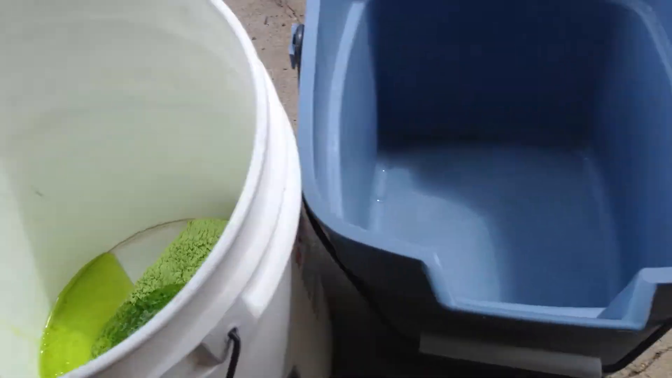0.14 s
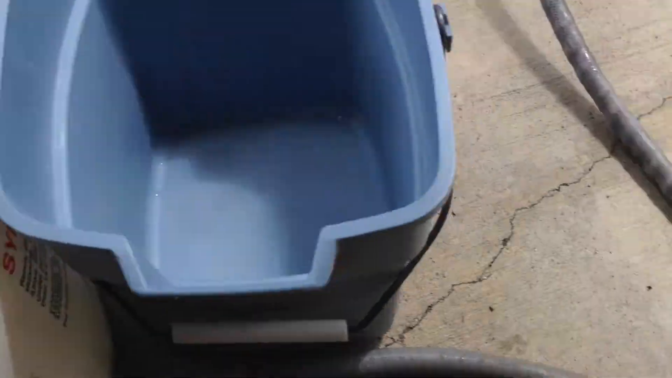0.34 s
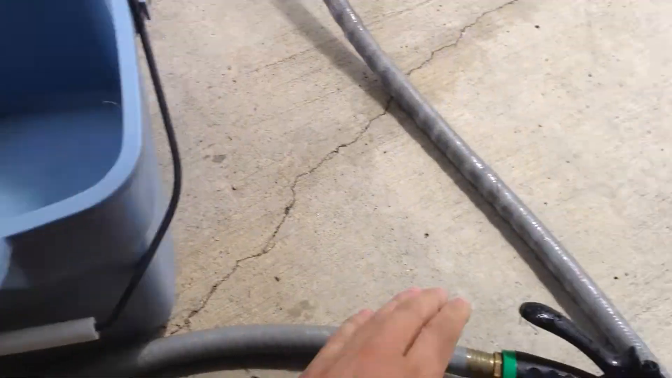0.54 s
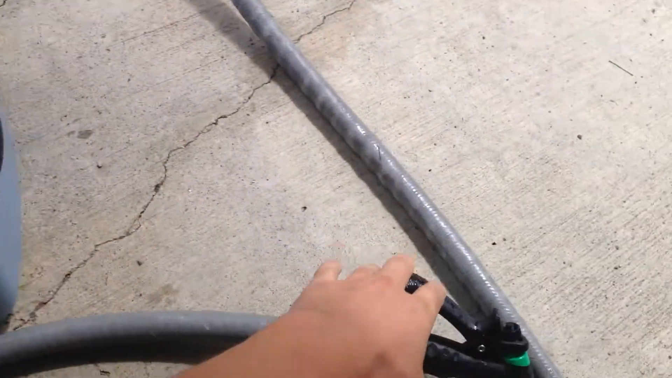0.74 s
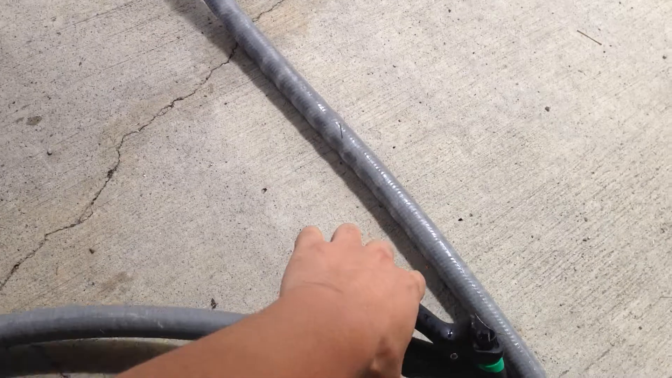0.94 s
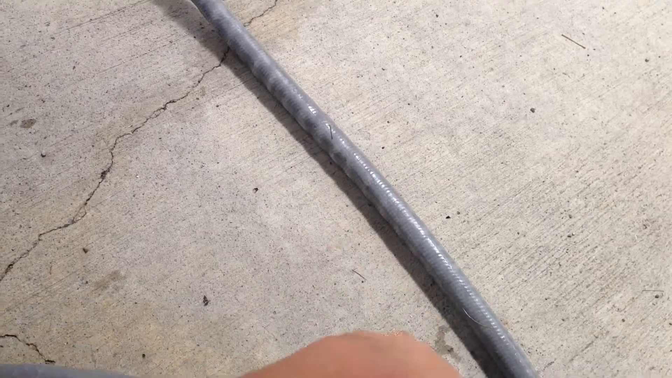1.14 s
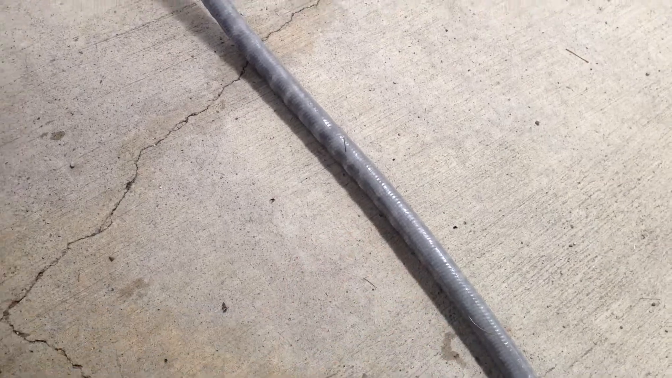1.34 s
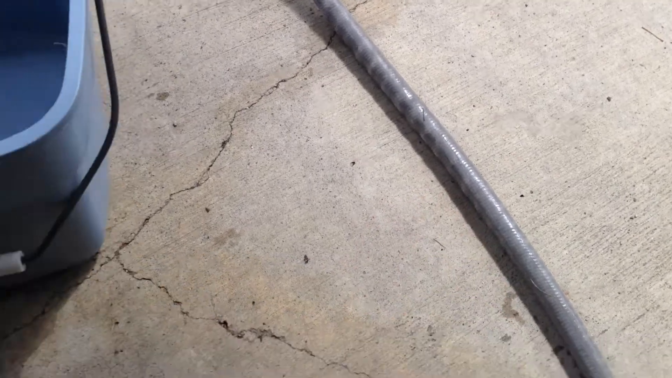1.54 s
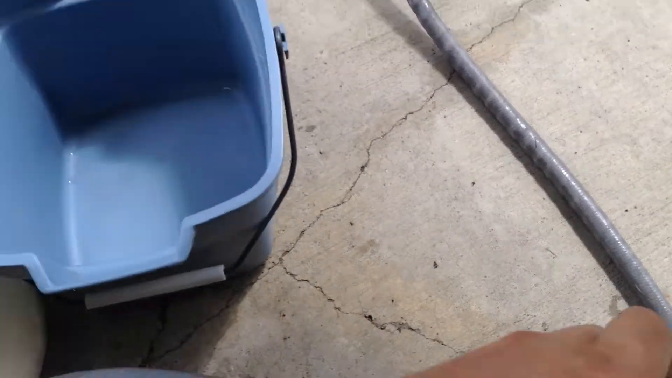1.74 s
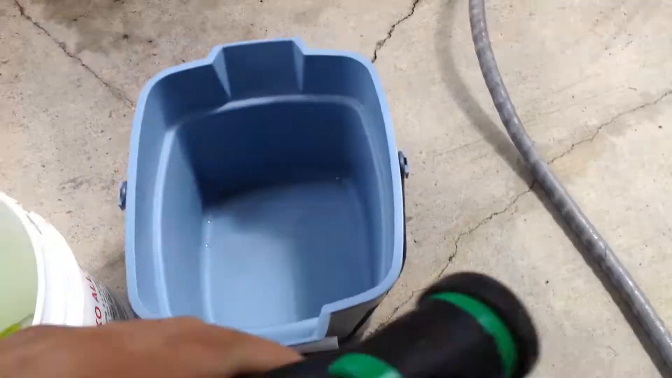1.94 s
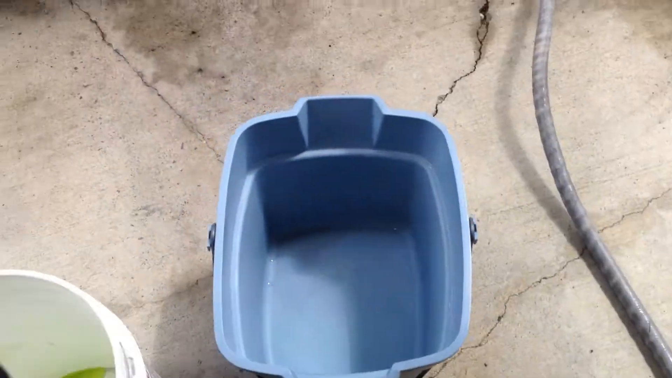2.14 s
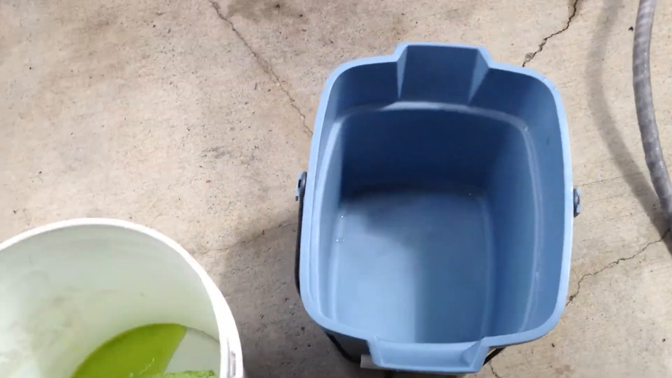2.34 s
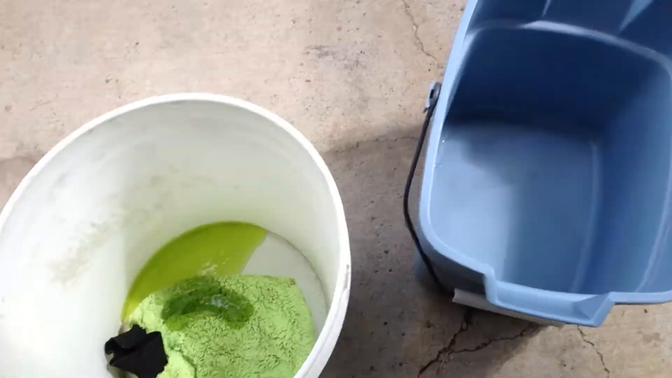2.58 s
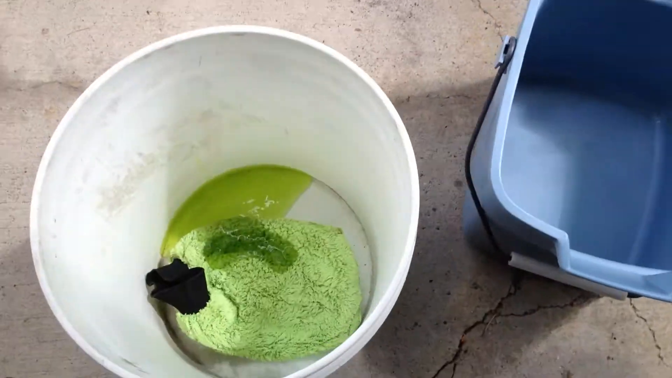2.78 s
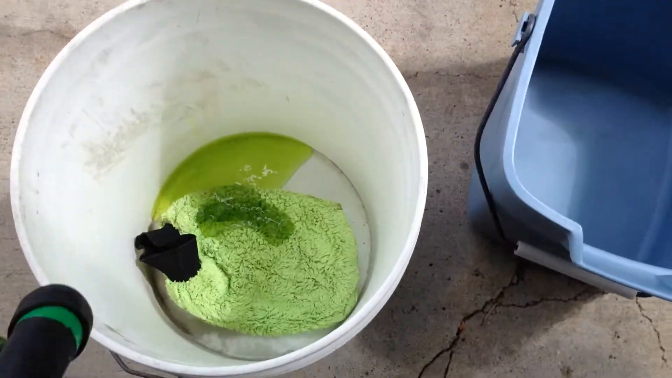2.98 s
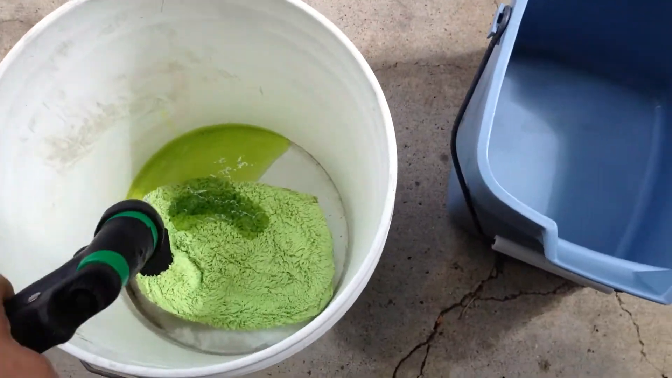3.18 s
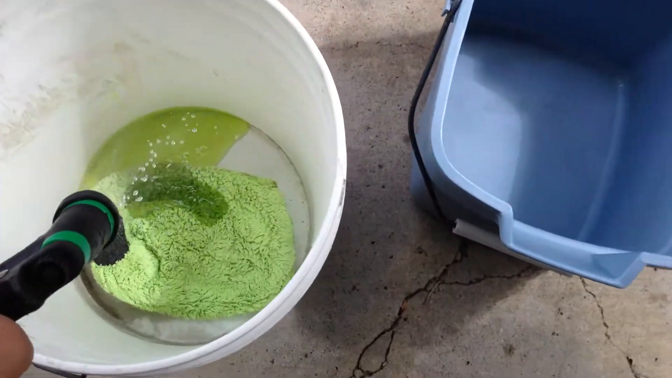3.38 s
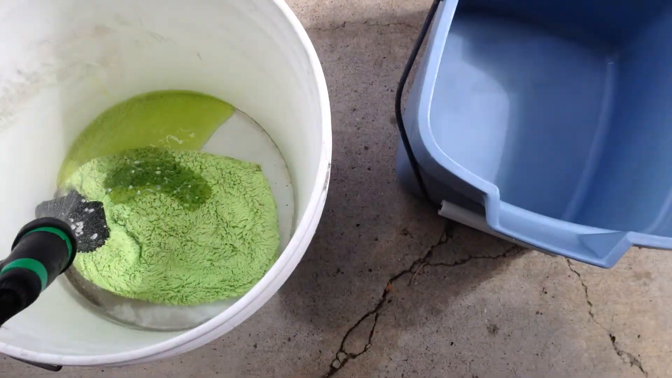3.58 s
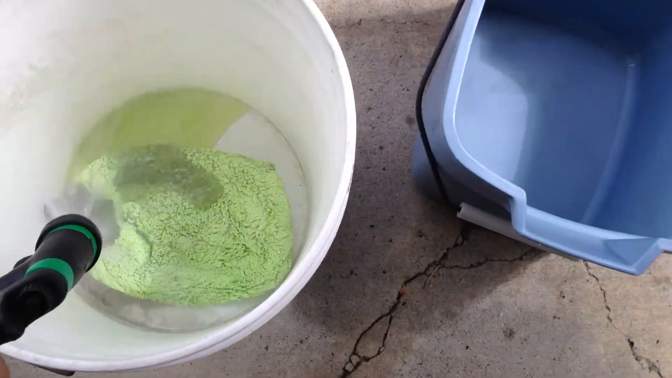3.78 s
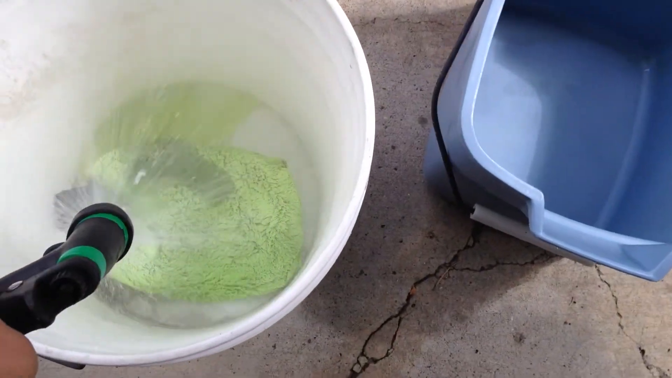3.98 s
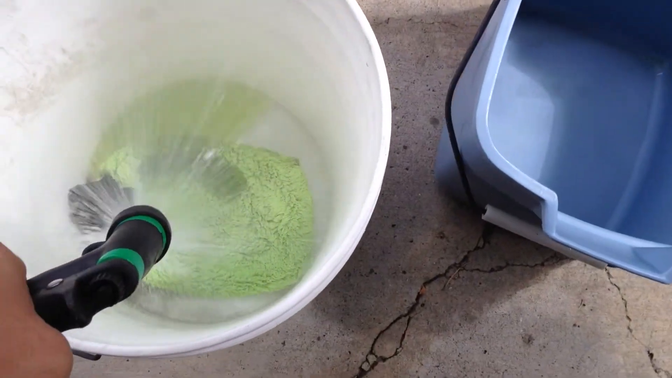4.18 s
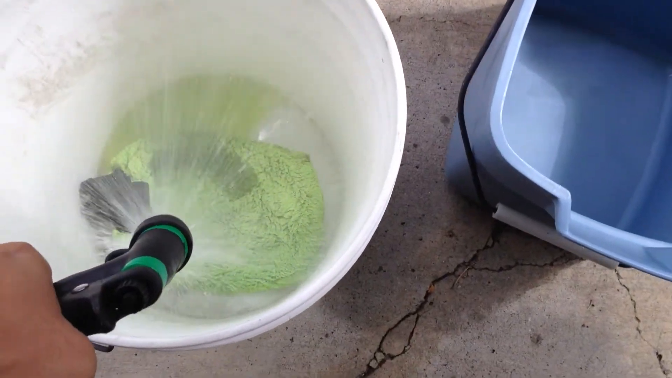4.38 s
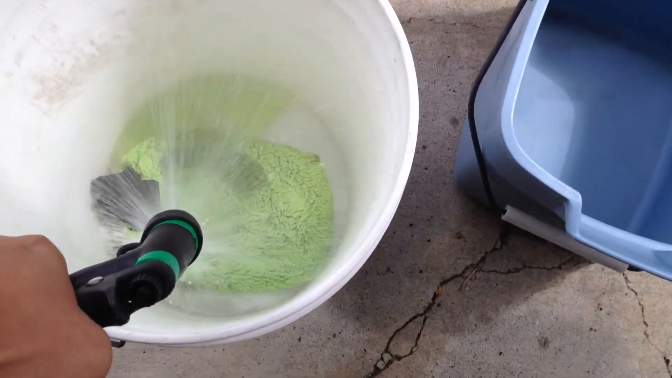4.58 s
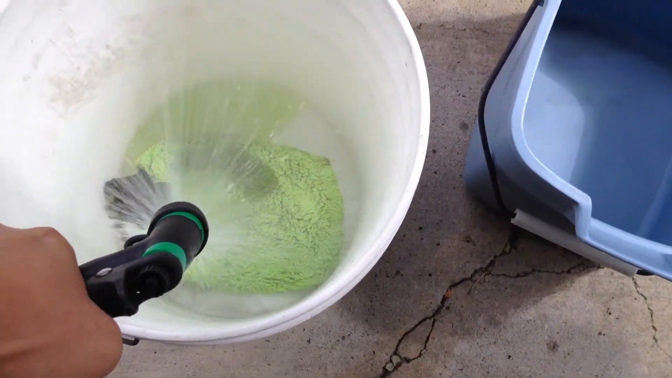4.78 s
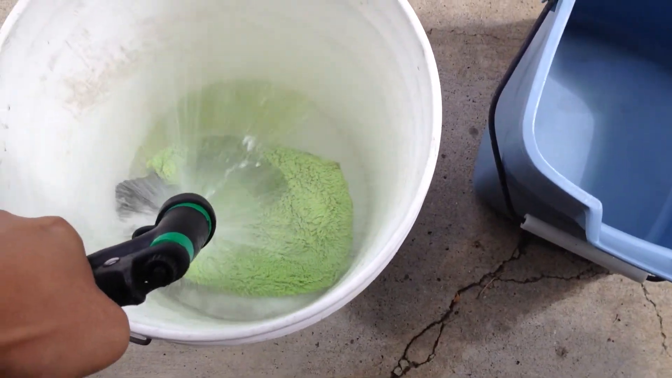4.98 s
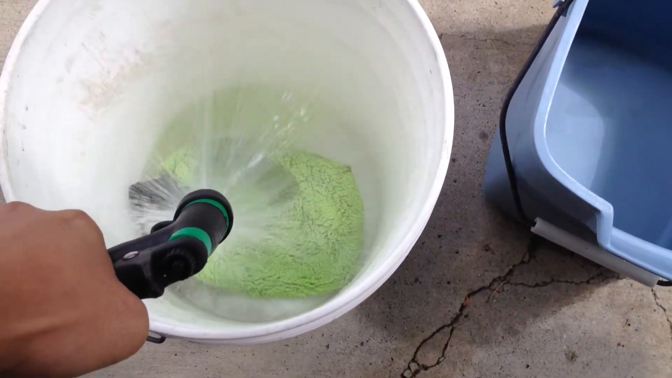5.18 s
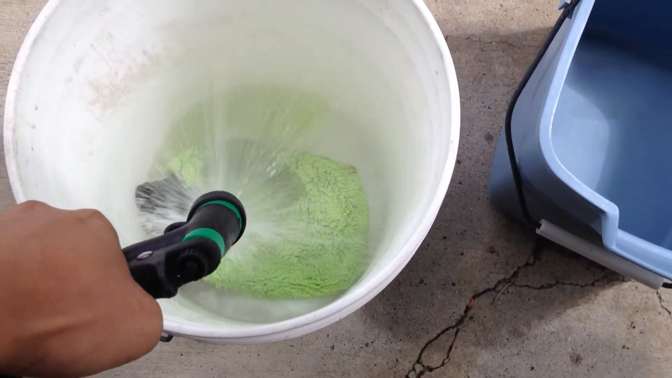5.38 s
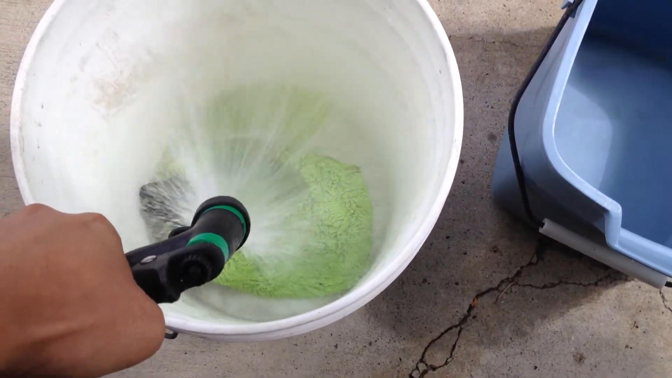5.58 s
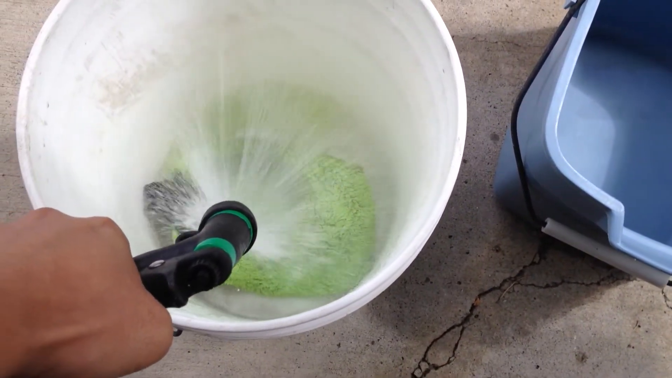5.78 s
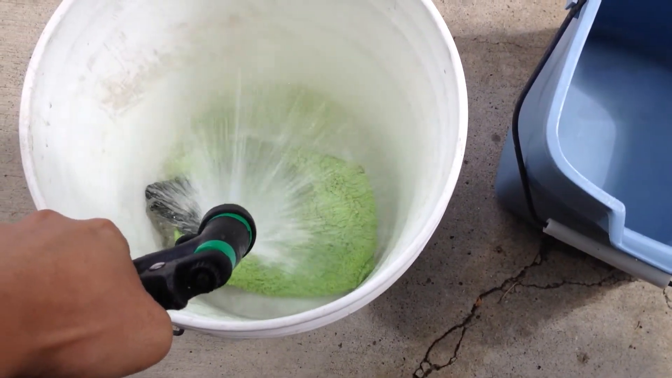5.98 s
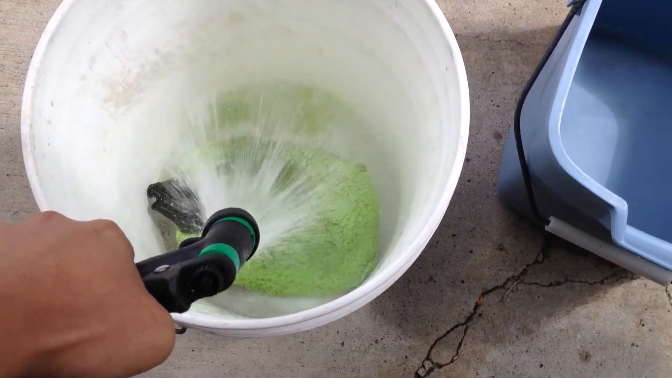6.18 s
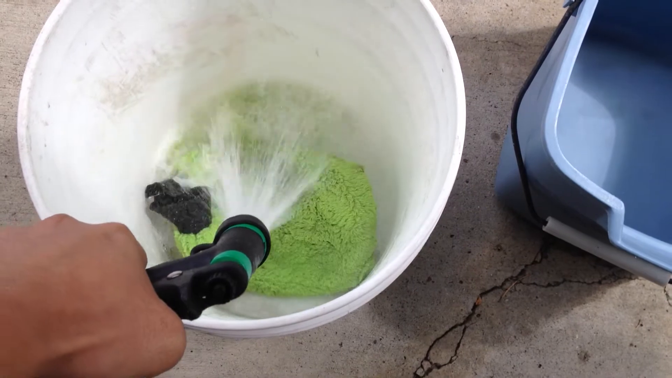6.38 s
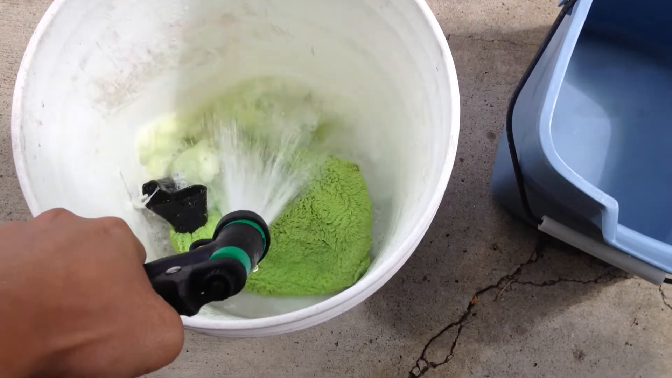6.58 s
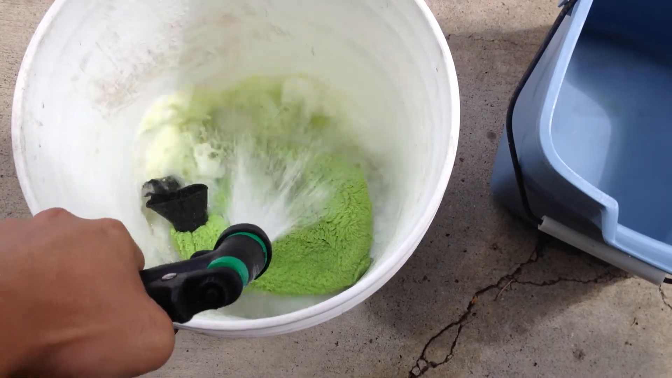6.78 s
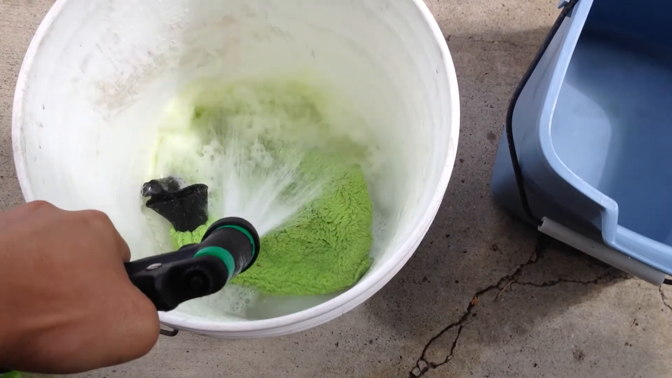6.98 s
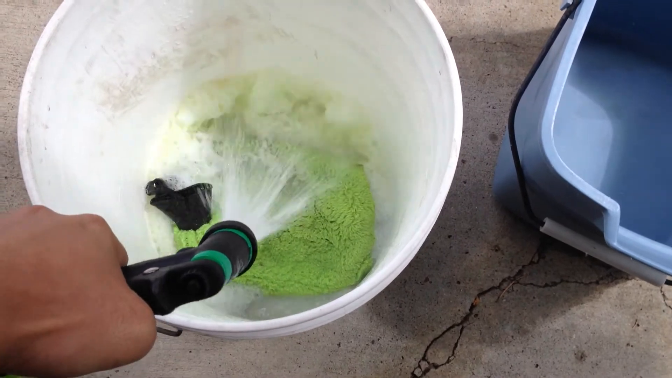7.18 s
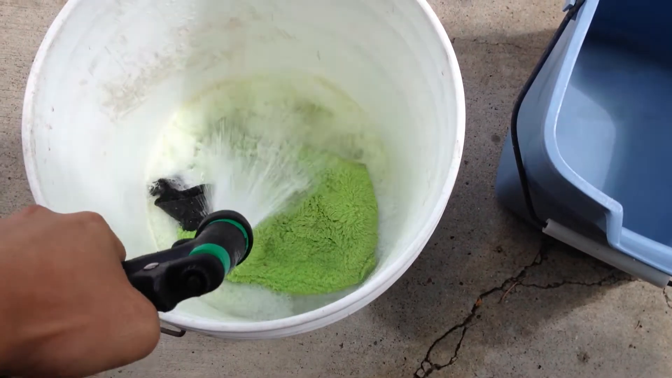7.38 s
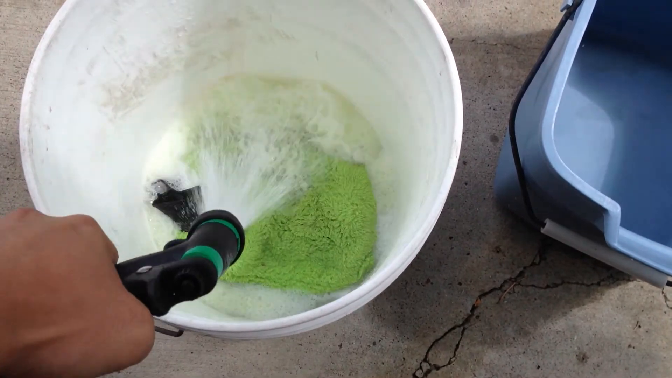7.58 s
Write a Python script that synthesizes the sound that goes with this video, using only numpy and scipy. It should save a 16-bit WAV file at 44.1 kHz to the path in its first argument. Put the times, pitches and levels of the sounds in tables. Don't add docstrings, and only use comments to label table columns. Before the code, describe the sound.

Outdoors on concrete, close to a hand-held phone, fingers thump and creak on its case while a hose nozzle faintly scrapes and ticks. Around two seconds it clatters loudly against plastic buckets, with hollow booms and tiny wire-handle tinkles. After a short lull the spray bursts on, hissing brightly and drumming on the bucket, then grows fuller, splashing and bubbling as water gathers.

```python
import sys
import numpy as np
from scipy import signal
from scipy.fft import rfft, irfft, next_fast_len
from scipy.io import wavfile
from scipy.ndimage import uniform_filter1d, map_coordinates

SR = 44100
rng = np.random.default_rng(int(sys.argv[2]) if len(sys.argv) > 2 else 0)


def wav_record(signal):
    frames = np.transpose(np.atleast_2d(signal))
    bounded = np.clip(frames, -1, 1)
    quanta = np.round(bounded * 32767).astype(np.int16)
    wavfile.write(sys.argv[1], SR, quanta)


def volts(x):
    e = np.asarray(x, float) / 20
    return 10 ** e


N = 336483
STEP = 22


def unit(x):
    return x / np.sqrt(np.mean(x ** 2) + 1e-20)


def curves(rows):
    s, *cols = np.transpose(rows)
    return [np.interp(np.arange(N) / SR, s, c) for c in cols]


def wobble(rate):
    knots = rng.standard_normal(int(N * rate / SR) + 4)
    return map_coordinates(knots, [np.arange(N) * rate / SR])


def humps(times, rise_db_per_s, hold, fall_db_per_s):
    age = np.arange(0, N, STEP) / SR - np.reshape(times, (-1, 1))
    hold, rise, fall = (np.reshape(v, (-1, 1)) for v in (np.abs(hold), rise_db_per_s, fall_db_per_s))
    return np.minimum(0, np.minimum(rise * age, fall * (hold - age)))


def summed(db, shapes):
    power = volts(2 * (shapes + db[:, None])).sum(axis=0)
    return np.interp(np.arange(N), np.arange(0, N, STEP), np.sqrt(power))


def filtered(x, response):
    m = next_fast_len(N + 8192)
    return irfft(rfft(x, m) * response(np.fft.rfftfreq(m, 1 / SR)), m)[..., :N]


def coloured(x, spectrum):
    hz, db = np.transpose(spectrum)
    return unit(filtered(x, lambda f: volts(np.interp(np.log(f + 1), np.log(hz), db, -120, -120))))


def ringing(peaks):
    def response(f):
        total = 0
        for k, (hz, width, db) in enumerate(peaks):
            damping = 1j * f * width
            total = total + (-1) ** k * volts(db) * damping / (hz * hz - f * f + damping)
        return total
    return response


def resonant(x, peaks):
    return unit(filtered(x, ringing(peaks)))


def patchy(depth_db):
    z = signal.stft(rng.standard_normal(N + 512), nperseg=512)[2]
    field = uniform_filter1d(uniform_filter1d(rng.standard_normal(z.shape), 6, 0), 8, 1)
    return unit(signal.istft(z * volts(depth_db * unit(field)), nperseg=512)[1][:N])


def drops(rate, spread_db):
    size = volts(spread_db * np.minimum(rng.exponential(size=N), 3)) * rng.standard_normal(N)
    return unit(size * (rng.random(N) < rate / SR))


# frequency in Hz, level in dB per Hz.
AIR_COLOUR = [(18, -31), (30, -7), (59, 1), (97, -15.5), (212, -9), (242, -14), (322, -14), (782, -21.5),
              (2110, -21.5), (2660, -24), (15300, -25)]


def air():
    return volts(-65.5) * coloured(patchy(depth_db=1.6), AIR_COLOUR)


def yard(x):
    t = np.arange(SR // 3) / SR
    tail = rng.standard_normal(len(t)) * volts(-60 * t / 0.19)
    echo = signal.fftconvolve(x, tail / np.linalg.norm(tail))[:N]
    return filtered(echo, lambda f: 1 / np.hypot(1, f / 5000))


# time in seconds, thump in dB, creak over it in dB,
# time to fade 10 dB in seconds (sign ignored, 0 is silent).
SQUEEZES = [(.01, -32.5, 4, 0.1125), (.07, -31.5, 3.5, 0.05), (.125, -37, -8, 0), (.2, -42, -16, 0),
            (.25, -45, -22, 0), (.45, -62, -10, 0.1), (.68, -70, 6, .03), (.86, -66.5, 5, 0.28),
            (.985, -58, 9, 0.06), (1.012, -58, 9.5, .012), (1.035, -58, 12, .01), (1.097, -61, 8, 0.1),
            (1.3, -62, -7, 0.34), (1.89, -58, -2, 0.3), (2.245, -30.5, -1, 0.09), (2.36, -30.5, 0, 0.0746),
            (2.66, -48, 0, 0.06), (2.73, -50, 2, 0.06), (2.8, -54, 5, 0.04), (3.02, -68, -6, -0.6),
            (3.385, -64, 0, -0.1), (3.62, -72, -3.5, 0.05)]
# frequency in Hz, level in dB per Hz.
THUMP_COLOUR = [(15, -35), (40, -10.5), (105, -1), (170, -3), (240, -25)]
# frequency in Hz, level in dB per Hz.
CREAK_COLOUR = [(200, -20.5), (260, -4.5), (360, -1.5), (430, -12.5), (700, -20), (1500, -42.5)]


def grip():
    s, thump_db, creak_db, fade = np.transpose(SQUEEZES)
    rise_share, creak_speed = 0.45, 1.88
    squeezes = humps(s, 10 / (rise_share * np.abs(fade)), 0, 10 / np.abs(fade))
    thump = unit(volts(1.5 * wobble(25)) * coloured(rng.standard_normal(N), THUMP_COLOUR))
    thump = unit(thump / np.abs(uniform_filter1d(thump ** 2, size=1400)) ** 0.3)
    creak = unit(volts(3.2 * wobble(39)) * coloured(rng.standard_normal(N), CREAK_COLOUR))
    creak_gain = summed(thump_db + creak_db, creak_speed * squeezes)
    return summed(thump_db, squeezes) * thump + creak_gain * creak


# time in seconds, pitch in Hz, peak in dB, number of swings.
FINGERTIPS = [(.342, 75, -52, 1), (.378, 90, -47, 1), (.402, 105, -46, 2), (.436, 100, -35, 1.5),
              (.437, 330, -52, 2), (.47, 100, -48, 2), (.499, 110, -43, .8), (.523, 60, -48, .8),
              (.57, 70, -56, 1), (.615, 65, -50, 1), (.637, 110, -44, 1), (.908, 90, -47, .8),
              (2.651, 153, -30, 2), (2.67, 130, -35, 2), (2.672, 370, -43, 5), (2.70, 125, -39, 2),
              (2.74, 160, -39, 3), (2.78, 135, -33, 1.3), (2.785, 310, -41, 3), (2.803, 150, -39, 2),
              (2.808, 385, -38, 6), (2.842, 140, -47, 1.5), (3.22, 65, -55, 1.5), (3.38, 130, -44, .8),
              (3.398, 75, -48, 1.5), (3.432, 60, -47, 1), (3.575, 60, -57, 1), (.035, 380, -30, 8),
              (.07, 340, -28, 6)]


def thuds():
    out = np.zeros(N)
    half = SR // 40
    for s, hz, db, swings in FINGERTIPS:
        turns = hz * (np.arange(-half, half) / SR)
        push = np.exp(-(2 * turns / swings) ** 2) * np.sin(2 * np.pi * turns)
        out[round(s * SR) - half:][:len(turns)] += volts(db) * push
    return out


# start in seconds, hold in seconds, rub in dB, grit over the rub in dB.
STROKES = [(.0, .01, -49, -29), (.03, .02, -56, -25), (.058, 0.008, -45, -25), (.09, .035, -59, -24),
           (.63, 0.09, -64.5, -7), (.828, 0.125, -61, -16), (1.17, .03, -71, -9), (1.208, .003, -61.5, -19),
           (1.28, .08, -73, -4), (1.37, 0.0625, -66, -13), (1.6, 0.25, -74, -9), (1.853, .012, -51, -23),
           (2.06, .02, -54, -8), (2.09, .03, -41, -9.5), (2.14, 0.024, -51, -5), (2.19, 0.015, -42, -17),
           (2.441, .05, -48, -20), (2.517, .02, -41.5, -27), (2.68, 0.11, -55, -11.5),
           (2.888, 0.019, -44, -7.5), (2.95, 0.0192, -68, -11)]
# frequency in Hz, level in dB per Hz.
RUB_COLOUR = [(300, -43.5), (700, -15), (1200, -9.5), (1700, -2.5), (2200, -2), (2600, -12), (3000, -20),
              (4200, -43), (7000, -120)]
# frequency in Hz, level in dB per Hz.
GRIT_COLOUR = [(2500, -42), (3500, 8.5), (6000, 1), (14000, -13.5), (16000, -35.5)]


def scuffs():
    s, hold, rub_db, grit_db = np.transpose(STROKES)
    strokes = humps(s, 2600, hold, 330.5)
    resting = volts(-81.5) * (np.arange(N) < NOZZLE_MOVES[0][0] * SR)
    rub = coloured(patchy(depth_db=4.0) + 0.89 * drops(rate=1500, spread_db=3.0), RUB_COLOUR)
    grit = coloured(patchy(depth_db=3.5) + 0.36 * drops(rate=1600, spread_db=11.0), GRIT_COLOUR)
    return summed(rub_db, strokes) * rub + (summed(rub_db + grit_db, strokes) + resting) * grit


# start in seconds, hold until damped in seconds, rms level in dB.
BOOM_EVENTS = [(1.886, .035, -28), (1.952, .02, -38), (2.008, .008, -42), (2.035, .03, -48),
               (2.123, 0.0085, -46), (2.219, .01, -31), (2.248, .044, -19), (2.305, .01, -30),
               (2.356, .042, -21), (2.415, 0.014, -30), (2.45, .025, -35), (2.505, .015, -39),
               (2.552, .048, -31)]


def boom():
    s, hold, db = np.transpose(BOOM_EVENTS)
    cycles = np.cumsum(231 * (1 + 0.037 * wobble(25))) / SR
    waver = volts(2.5 * wobble(40))
    gain = summed(db, humps(s, 1600, hold, 1200))
    return gain * waver * np.sqrt(2) * np.sin(2 * np.pi * cycles)


def struck(modes, rattle):
    t = np.arange(4096)[:, None] / SR
    hz, width, db = np.transpose(modes)
    strength, detune, phase = rng.standard_normal((3, len(modes)))
    hz = hz * (1 + .012 * detune)
    decay = np.exp(-np.pi * width * t) * (1 - np.exp(-t * hz / 0.36))
    ring = volts(db + 2 * strength) * decay * np.sin(2 * np.pi * (hz * t + phase))
    sound = signal.fftconvolve(rattle, ring.sum(axis=1))[:len(rattle)]
    return sound / np.abs(sound).max()


def contact(depth_db, hard_db, spot_hz, body, bright, dryness, click_lasts, edge):
    t = np.arange(SR // 4) / SR
    t60 = 0.063 * dryness * np.array([[1], [1], [click_lasts]])
    lumps = volts(47 * uniform_filter1d(rng.standard_normal(len(t)), size=64))
    rattle = rng.standard_normal((3, len(t))) * lumps * volts(-60 * t / t60)
    blow = 8 * np.exp(-((t - .0002) / .00008) ** 2)
    near = [(hz, width, db - 21 * abs(np.log2(hz / spot_hz))) for hz, width, db in body]
    sound = struck(near, rattle[0] + blow)
    sound = sound + volts(depth_db - 7.5) * struck(LOW_WALL_MODES, rattle[1] + blow)
    sound = sound * (1 - np.exp(-t / 0.00061))
    return sound + volts(hard_db + 3) * struck(bright, rattle[2] + edge * (t == 0))


def tinkle(hz):
    t = np.arange(SR // 4) / SR
    rough = 1 + 3.6 * uniform_filter1d(rng.standard_normal(len(t)), size=40)
    return volts(-60 * t / .045) * (1 - np.exp(-t / .001)) * np.sin(2 * np.pi * hz * t) * rough


# time in seconds, strength in dB, depth in dB, hardness in dB,
# pitch at the spot struck in Hz.
CONCRETE_TICKS = [(.0592, -28, -9, -19, 1780), (.1214, -49, -1.5, -10, 2000), (.1854, -59, -4, 6, 2000),
                  (.3391, -57, -14, 11, 2200), (.5846, -50, -19, -3, 2100), (.83, -44, -14, -8, 1800),
                  (.9574, -55, -4.5, -8, 2400), (.976, -54, 0, -20, 1500), (.985, -39, 0, -25, 1500),
                  (.9905, -48, -5, -20, 2900), (.998, -47, -5, -20, 1500), (1.0046, -27, -3, -31, 1500),
                  (1.0125, -31, -12, -25, 2500), (1.02, -47, -6, -20, 1600), (1.0284, -43, 2, -20, 2900),
                  (1.033, -44, 2, -22, 1500), (1.0486, -53, -4, -18, 1600), (1.0886, -52, 4, -18, 2800),
                  (1.098, -56, 5, -18, 2900), (1.105, -38, -6, -27, 1500), (1.1258, -46, -14, -10, 3200),
                  (1.209, -55, -12, 10, 2200), (1.2594, -57, -11, 4, 2000), (1.2955, -63, -9, 11, 2000),
                  (1.336, -58, -14, 13, 2200), (1.3584, -60, -9, 5, 2000), (1.386, -68, -9, 8, 2000),
                  (1.43, -60, -3, -1, 2300)]
# time in seconds, strength in dB, depth in dB, hardness in dB, pitch at
# the spot struck in Hz.
BUCKET_KNOCKS = [(1.8635, -34, -15.5, -20, 2100), (1.868, -12.5, -10.5, -14, 2150),
                 (1.873, -8.5, -9, -16.5, 1830), (1.877, -8, -12.5, -30, 940), (1.8785, -3, -12, -17, 1600),
                 (1.887, -11, -9, -14.5, 1604), (1.8987, -17.5, -9, -25, 1202), (1.912, -20, -5, -14.5, 1600),
                 (1.916, -21.5, -5.5, -24.5, 950), (1.93, -28, -5.5, -15, 1500),
                 (1.948, -23.5, -3, -14.5, 960), (1.9747, -29.5, -5, -30.5, 1627),
                 (2.01, -42.5, 3, -16, 1200), (2.045, -45, -10, -16, 1480), (2.0894, -31, -14, -18.5, 2000),
                 (2.096, -31.5, -13, -18.5, 1910), (2.1211, -28.5, -12.5, -15, 1810),
                 (2.1427, -27, -25, -17.5, 1980), (2.164, -37, -12.5, -18, 950),
                 (2.1837, -29.5, -9, -20, 1560), (2.189, -32.5, -6, -20, 945),
                 (2.213, -29.5, -3, -12.5, 2000), (2.2185, -17, -6, -3.5, 1060), (2.221, -20, -9, -9.5, 2150),
              (2.228, -20, -8, -15.5, 1000), (2.2405, -8, 2, -29, 617), (2.246, -12.5, 1.5, -20, 1830),
              (2.262, -25, 4, -18, 1900), (2.275, -13, -5, -30, 1300), (2.286, -24, -3, -20, 800),
              (2.301, -28, -3, -17.5, 2200), (2.324, -27.5, -5, -17.5, 1010),
              (2.3309, -5, -20, -18.5, 1770), (2.3328, -7, -20, -30, 1220), (2.346, -9, -3, -15, 600),
              (2.351, -7.5, -6, -22, 1600), (2.356, -13.5, 0, -8.5, 2100), (2.363, -11.5, -6, -19.5, 1500),
              (2.379, -19, -2, -22, 1100), (2.39, -24.5, -5, -20, 1600), (2.41, -26, 1, -19.5, 560),
              (2.425, -29.5, -2.5, -18, 1205), (2.447, -34, -1, -18.5, 950), (2.4693, -28, -3, -22.5, 1540),
              (2.524, -29.5, -9, -22, 1400), (2.5385, -4, -14.5, -26.5, 1760),
              (2.547, -14, -6, -17.5, 2050), (2.555, -15, -2.5, -17, 1590), (2.567, -25, 0, -22, 2280),
              (2.59, -29.5, 1, -20, 950), (2.609, -15, -11, -20, 1720), (2.62, -25, -12, -19, 1590),
              (2.64, -22.5, -9.5, -29.5, 1720), (2.644, -26, -10, -33.5, 1180),
              (2.7194, -52.5, 1, -9.5, 1500), (2.766, -43, -12, -3.5, 1800),
              (2.8903, -35.5, -25, -17.5, 1900), (2.9594, -55, -16, -6, 1900)]
# time in seconds, pitch in Hz, level in dB.
HANDLE_TINKLES = [
    (1.947, 7900, -46),
    (2.219, 5600, -37.5),
    (2.398, 7900, -57),
    (2.462, 7900, -54),
    (2.464, 8900, -59),
    (2.484, 6200, -58.5),
    (2.61, 8600, -46.5),
    (1.945, 3550, -40.5),
]
# frequency in Hz, width in Hz, level in dB.
NOZZLE_MODES = [(1540, 240, 3), (2050, 290, 0), (2440, 250, -6), (2910, 160, 0), (3280, 250, -4)]
# frequency in Hz, width in Hz, level in dB.
LEVER_MODES = [(3870, 890, -6), (5480, 1000, 0), (6800, 1000, 1), (9800, 1800, 1), (12800, 2600, -1.5)]
# frequency in Hz, width in Hz, level in dB.
LOW_WALL_MODES = [(550, 60, -7), (670, 80, -8), (810, 80, -5), (950, 50, 0), (1100, 70, -5)]
# frequency in Hz, width in Hz, level in dB.
WALL_MODES = [(1140, 70, -4), (1235, 77, -2.5), (1480, 90, -6.5), (1589, 83, 0.5), (1745, 80, 1.5),
              (1900, 110, -1), (2050, 80, -2), (2200, 61, -0.5), (2320, 66, -3), (2500, 47, -3)]
# frequency in Hz, width in Hz, level in dB.
CLICK_MODES = [(3020, 320, -4.5), (3410, 360, 0.5), (4570, 890, -1.5), (5450, 710, -4.5), (6450, 950, -3.5),
               (8600, 560, -6.5), (11000, 3900, 3), (14000, 3000, -3.5)]


def knocks():
    out = np.zeros(N + SR)

    def add(s, db, sound):
        out[round(s * SR):][:len(sound)] += volts(db) * sound

    for s, db, *blow in CONCRETE_TICKS:
        add(s, db, contact(*blow, NOZZLE_MODES, LEVER_MODES, dryness=.55, click_lasts=.6, edge=7))
    wall = [*LOW_WALL_MODES, *WALL_MODES]
    for s, db, *blow in BUCKET_KNOCKS:
        add(s, db, contact(*blow, wall, CLICK_MODES, dryness=.6, click_lasts=.9, edge=3.5))
    for s, hz, db in HANDLE_TINKLES:
        add(s, db, tinkle(hz))
    return out[:N]


def bubbles(centre_hz, cycles, count):
    draw, t = rng.standard_normal((count, 2)), np.arange(700) / SR
    start = rng.integers(0, N, count)[:, None] + np.arange(700)
    hz = centre_hz * np.exp(0.3188 * draw[:, :1])
    age = hz * t / cycles
    swell = volts(2.6 * draw[:, 1:]) * age * np.exp(-6 * age)
    tone = swell * np.sin(2 * np.pi * hz * t * (1 + 0.13 * age))
    return unit(np.bincount(start.ravel(), tone.ravel())[:N])


def drifting(x, depth_db):
    z = signal.stft(x, nperseg=512)[2]
    field = rng.standard_normal(z.shape)
    for _ in range(2):
        field = uniform_filter1d(uniform_filter1d(field, size=12, axis=0), size=50, axis=1)
    return signal.istft(z * volts(depth_db * unit(field)), nperseg=512)[1][:N]


# time in seconds, flow in dB, aim at the wall in dB, treble tilt in dB.
NOZZLE_MOVES = [(3.24, -58, -0.5, -4.5), (3.3, -38, -12, -2), (3.38, -32, -6, -2), (3.6, -36.5, -5.5, -1.5),
                (3.738, -27.5, -12, -3), (3.8, -6.5, -4, -0.5), (3.86, -0.4, -0.5, -0.5),
                (4.0, 0.7, 0.3, 0.5), (4.3, 0.7, 0, -1.5), (4.58, -0.14, -0.5, 4), (4.95, -1, -1, -5),
                (5.4, 0, -1.4, -3.5), (5.8, -3, 4, -1.4), (6.28, -2, 2.5, -2.5), (6.5, 2.5, -4, 2.3),
                (6.75, 0.84, -5, 2.5), (6.92, 0.14, -5, 0.6), (7.63, -2, -4.5, -0.2)]
# time in seconds, share of the jet landing in water from 0 to 1.
WATER_SHARE = [
    (3.2, 0.26),
    (5.4, 0.13),
    (6.3, 0.41),
    (6.55, 1),
    (7.63, 0.99),
]
# time in seconds, change on the wall in dB, change on the
# surface in dB.
WAVES = [(3.55, -2, 11), (3.605, 0, 17), (3.91, 0.5, 3), (6.48, -0.6, 2), (6.57, 0, -4.5), (6.64, 3.5, 1.5),
         (6.7, 3.5, -1.5), (6.79, -0.5, 4), (6.95, 1.5, 4.5), (7.0, -2.5, 2), (7.04, 6.5, -1),
         (7.07, -6.5, -1), (7.26, 2, 1), (7.31, -5.5, -1.5), (7.5, 0.5, -0.5), (7.57, -4, -2)]
# frequency in Hz, width in Hz, level in dB.
EMPTY_DRUM = [(1340, 160, -8), (1410, 130, -22.5), (1753, 246, 25), (2440, 130, -16), (3200, 200, -4)]
# frequency in Hz, width in Hz, level in dB.
WET_DRUM = [(1414, 83, 0), (1985, 130, 4), (2446, 110, 2), (3194, 340, -6)]
# frequency in Hz, level in dB per Hz.
EMPTY_HISS = [(1650, -19), (2800, 7), (3180, -10), (4020, -7.5), (5350, 4), (9850, 3.5), (11200, 1.5),
              (14600, 3), (15300, -1.5)]
# frequency in Hz, level in dB per Hz.
WET_HISS = [(1650, -12), (2800, -4.5), (3140, -3.5), (4020, -5.5), (5420, -2.5), (7310, -6), (8540, -2),
            (13300, -3.5), (15300, -3)]
# frequency in Hz, level in dB per Hz.
SPLASH_COLOUR = [(190, -24), (330, -17.5), (441, -13.5), (744, 0), (828, -4.5), (989, -5.5), (1250, -2),
                 (1620, -15), (2750, -120)]
# frequency in Hz, level in dB per Hz.
COLUMN_COLOUR = [(18, -61), (30, -33), (102, -15), (140, -9.5), (220, 7), (302, 0), (400, -6), (520, -57),
                 (880, -120)]


def spray():
    flow_db, aim_db, tilt_db = curves(NOZZLE_MOVES)
    t = np.arange(N) / SR
    opened = t > NOZZLE_MOVES[0][0]
    wet = np.clip(curves(WATER_SHARE)[0], 0, 1)
    coarse = t[::STEP]
    waves_db = sum(np.outer(db, np.exp(-((coarse - s) / 0.032) ** 2)) for s, *db in WAVES)
    wall_wave_db, surface_wave_db = [np.interp(t, coarse, db) for db in waves_db]

    def follows(db, wet_db, growth, lag_s):
        return db + wet_db * wet ** 2 + growth * np.interp(t - lag_s, t, flow_db) + aim_db

    def blend(empty, full):
        return np.sqrt(1 - wet) * empty + np.sqrt(wet) * full

    jet_db = -30 + 8.4 * wet ** 2 + flow_db
    drum_db = follows(-27, wet_db=7.5, growth=1.07, lag_s=0.036) + wall_wave_db
    splash_db = follows(-42.5, wet_db=15, growth=0.95, lag_s=0.02) + surface_wave_db
    column_db = follows(-47, wet_db=9, growth=0.5, lag_s=0.17)
    surge = (0.14 + 0.49 * wet) * (wobble(14) + 1.1 * wobble(45))

    fizz = [patchy(depth_db=2) + 0.48 * drops(rate=4200, spread_db=1.5) for _ in range(2)]
    hiss = blend(coloured(fizz[0], EMPTY_HISS), coloured(fizz[1], WET_HISS))
    jet = volts(jet_db + 0.72 * surge) * hiss
    mid_treble = filtered(jet, lambda f: np.exp(-((f - 6600) / 1700) ** 2))
    jet = drifting(np.pad(jet + (volts(tilt_db) - 1) * mid_treble, (0, 512)), depth_db=1.05)

    beats = [patchy(depth_db=1.2) + .5 * drops(rate=990, spread_db=3.5) for _ in range(2)]
    drumming = blend(resonant(beats[0], EMPTY_DRUM), resonant(beats[1], WET_DRUM))
    drum = volts(drum_db + .85 * surge) * drumming

    gurgle = bubbles(centre_hz=764, cycles=9.3, count=3000) + bubbles(centre_hz=2108, cycles=15, count=3000)
    foam = coloured(patchy(depth_db=1.5), SPLASH_COLOUR) + 0.58 * wet * gurgle
    splash = volts(splash_db + surge + 0.93 * wobble(11)) * foam
    rumble = volts(column_db + 0.74 * wobble(9)) * coloured(patchy(depth_db=0.5), COLUMN_COLOUR)
    return opened * (jet + drum + splash + rumble)


def scene():
    hits = knocks()
    lows = filtered(boom() + grip() + thuds(), lambda f: (f / np.hypot(f, 55)) ** 2)
    mono = air() + hits + volts(-8) * yard(hits) + scuffs() + lows + spray()
    return np.array([mono, mono])


# frequency in Hz, rarity as a threshold in sigmas.
DROPOUT_RARITY = [(2600, 4.5), (2760, 1.6), (3000, 3.6), (7000, 2.9), (11000, 2.5), (15000, 2.1)]


def dropouts(x):
    hz, _, z = signal.stft(x, SR, nperseg=1024)
    field = rng.standard_normal(z.shape[1:])
    field = uniform_filter1d(uniform_filter1d(field, size=2, axis=0), size=6, axis=1)
    dropped = unit(field) > np.interp(hz, *np.transpose(DROPOUT_RARITY))[:, None]
    dropped = dropped | np.roll(dropped, 1, axis=0) | np.roll(dropped, 1, axis=1)
    return signal.istft(z * ~dropped, SR, nperseg=1024)[1][:, :N]


# time in seconds, lower edge in Hz, upper edge in Hz, level in dB.
PUFFS = [
    (4.32, 5180, 7100, -37),
    (4.96, 6200, 8400, -43.5),
    (5.17, 8200, 9800, -40.5),
    (5.17, 11000, 12500, -42),
    (6.911, 6230, 7700, -35),
    (6.91, 11700, 14000, -32.5),
    (7.423, 4700, 6470, -33),
    (7.491, 8200, 10460, -32),
]


def flecks():
    out, size = np.zeros(N), 2048
    hz = np.fft.rfftfreq(size, 1 / SR)
    for s, lo_hz, hi_hz, db in PUFFS:
        inside = np.abs(hz - (lo_hz + hi_hz) / 2) < (hi_hz - lo_hz) / 2
        band = unit(irfft(rfft(rng.standard_normal(size)) * inside))
        out[round(s * SR) - size // 2:][:size] += volts(db) * band * np.hanning(size)
    return out * [[1], [-1]]


def top_cut(x):
    return signal.sosfilt(signal.butter(12, 16550, fs=SR, output="sos"), x)


def record(dry):
    ceiling, top_hz, bass_hz = .7, 15400, 45
    limited = dry / (1 + np.abs(dry / ceiling) ** 6) ** (1 / 6)

    def response(f):
        gap = 1 - 0.5 * np.exp(-((f - 2760) / 55) ** 2)
        return (f < top_hz) * gap * f / np.hypot(f, bass_hz)

    mix = dropouts(filtered(limited, response)) + flecks()
    return top_cut(mix)


dry = scene()
out = record(dry)
wav_record(out)
```